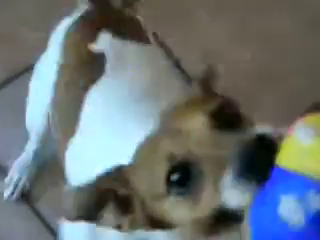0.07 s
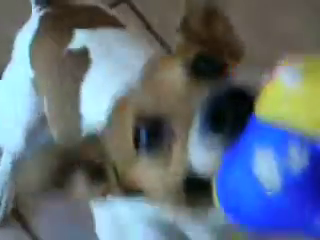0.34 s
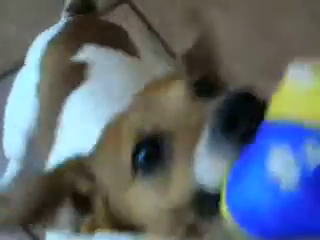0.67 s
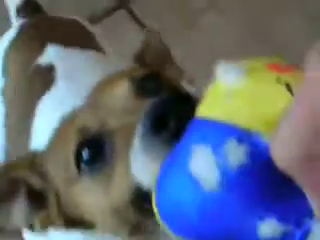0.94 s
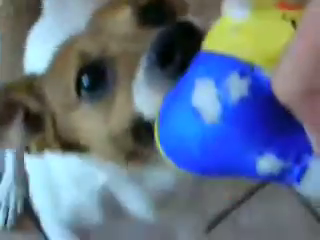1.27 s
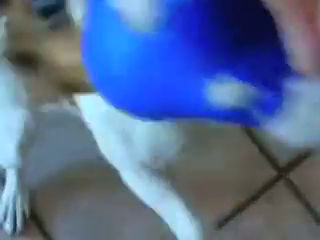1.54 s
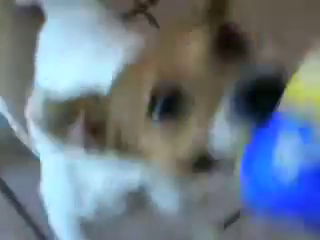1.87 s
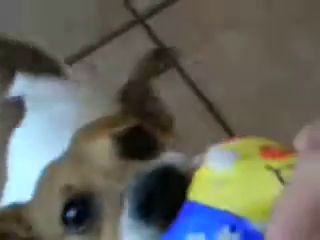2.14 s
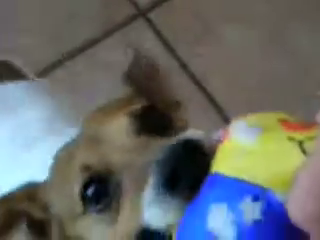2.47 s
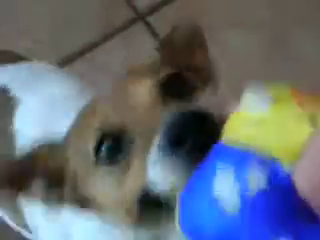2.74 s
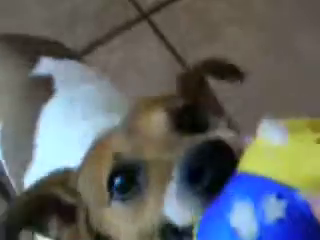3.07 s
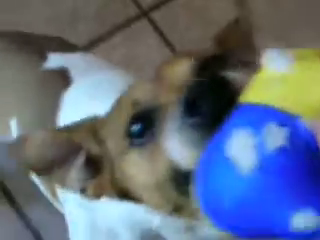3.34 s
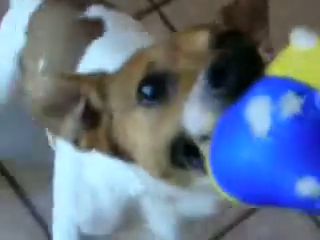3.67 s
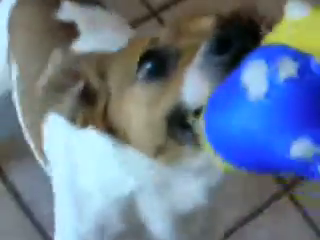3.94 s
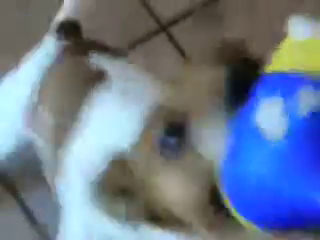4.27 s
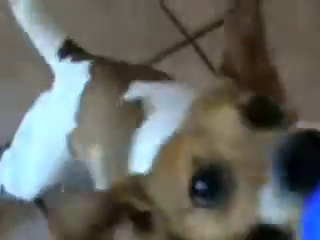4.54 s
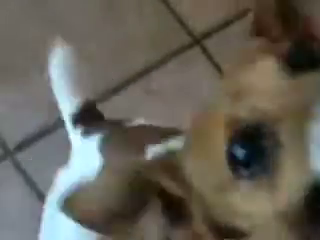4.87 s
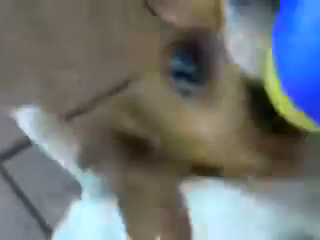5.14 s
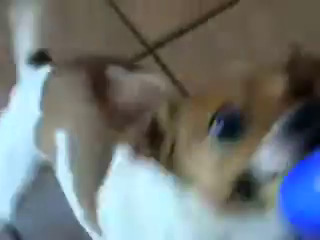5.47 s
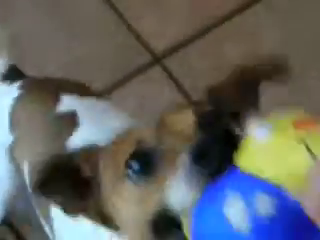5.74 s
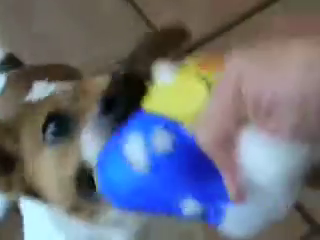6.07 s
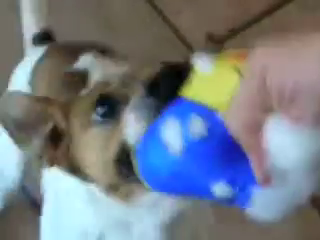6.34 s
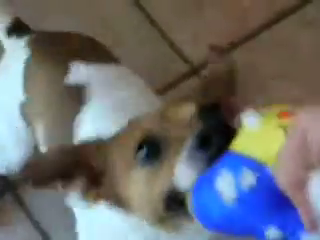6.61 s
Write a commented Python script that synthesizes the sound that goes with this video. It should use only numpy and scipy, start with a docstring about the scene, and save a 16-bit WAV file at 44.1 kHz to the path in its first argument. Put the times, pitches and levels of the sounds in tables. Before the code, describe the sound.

Close, fluttering growls from a small dog playing tug, each starting with a bark-like snap, in a ringing tiled room.

```python
"""First comes a short, clean whine: a small dog is tugging at a toy on a tiled floor, close by.
It yelps, then growls in six bouts, each opening with a bark-like snap and running on as a fluttering
rattle; once more the voice flips into a whine. Its vocal folds make the pitch; chest, throat and mouth
shape the barks and growls. Paws and toy knock and squeak, the hard room rings over a steady hiss,
and a narrow-band recorder limits and clips the peaks."""
import sys
import numpy as np
from scipy import signal
from scipy.fft import rfft, irfft, next_fast_len
from scipy.io import wavfile
from scipy.ndimage import uniform_filter1d, minimum_filter1d, map_coordinates

SR = 44100
rng = np.random.default_rng(int(sys.argv[2]) if len(sys.argv) > 2 else 0)


def pcm_store(signal):
    """Save signal as 16-bit PCM."""
    levels = np.round(np.clip(np.atleast_2d(signal), -1, 1) * 32767)
    wavfile.write(sys.argv[1], SR, levels.astype(np.int16).T)


N = 303849


def amp(db):
    """Turn decibels into a gain."""
    return 10 ** (np.asarray(db) / 20)


def unit(x):
    """Scale each row to an average (rms) level of 1."""
    return x / np.sqrt(np.mean(x ** 2, axis=-1, keepdims=True) + 1e-20)


def along(points, hz):
    """Read between (Hz, value) points on a log frequency axis."""
    freqs, values = np.transpose(points)
    return np.interp(np.log(hz + 1), np.log(freqs + 1), values)


def read(rows, t):
    """Read each column of a table at the times t."""
    times, *columns = np.transpose(rows)
    return [np.interp(t, times, column) for column in columns]


def wobble(rate, size):
    """A smooth curve through `rate` random points a second."""
    points = rng.standard_normal(int(N * rate / SR) + 4)
    return map_coordinates(points, [np.arange(size) * rate / SR])


def filtered(x, response):
    """Give each frequency of x its own gain."""
    size = next_fast_len(len(x) + 8192)
    return irfft(rfft(x, size) * response(np.fft.rfftfreq(size, 1 / SR)), size)[:len(x)]


def noise(spectrum, size):
    """Noise shaped by (Hz, dB) points, at an rms level of 1."""
    return unit(filtered(rng.standard_normal(size), lambda hz: amp(along(spectrum, hz))))


def causal(gain):
    """Turn each row of gains into a filter that rings only after it is struck."""
    cepstrum = irfft(np.log(gain + 1e-6))
    half = cepstrum.shape[-1] // 2
    cepstrum[:, 1:half] *= 2
    cepstrum[:, half + 1:] = 0
    return np.exp(rfft(cepstrum))


def add(track, start, sound):
    """Mix a sound into the track, `start` seconds in."""
    part = track[max(round(start * SR), 0):][:len(sound)]
    part += sound[:len(part)]


# One list per whine. Each row: time in seconds, pitch in Hz, level in dB,
# upper overtones in dB relative to that level.
WHINE_NOTES = [
    [(0, 411.7, -12, -13.5), (.06, 398, -12.5, -13), (.145, 392, -12, -12), (.167, 365.6, -9, -13.5)],
    [(4.36, 408.7, -18.5, -20.5), (4.382, 445, -13.5, -9), (4.42, 432.3, -15, -3),
     (4.448, 428.6, -14.5, -15)],
]
# Each row: harmonic number, strength in dB within its group (the lowest three, or the rest).
WHINE_HARMONICS = [(1, -8), (2, -0.5), (3, -4), (4, -24), (5, -22.5), (6, -24), (7, -27.5), (8, -30.5)]

def whines(waver=0.0099, fade_s=0.0025):
    """Tight vocal folds sing a clean high note whose upper overtones open with effort."""
    out, t = np.zeros(N), np.arange(N) / SR
    for note in WHINE_NOTES:
        start, end = note[0][0], note[-1][0]
        pitch, level_db, bright_db = read(note, t)
        phase = 2 * np.pi * np.cumsum(pitch * (1 + waver * wobble(90, N))) / SR
        on = (t >= start) & (t <= end)
        harmonics = np.array([amp(db) * np.cos(k * phase[on]) for k, db in WHINE_HARMONICS])
        low, high = unit(harmonics[:3].sum(0)), unit(harmonics[3:].sum(0))
        fade = np.clip(np.minimum(t[on] - start, end - t[on]) / fade_s, 0, 1)
        out[on] += fade * amp(level_db[on]) * (low + amp(bright_db[on]) * high)
    return out


# The tone of the hiss. Each row: frequency in Hz, relative level in dB.
HISS_SPECTRUM = [(50, -29.5), (130, -24.5), (200, -13), (1100, -17.5), (3500, -18), (4200, -28.5)]

def steady_hiss(level_db=-41.5):
    """A faint, steady hiss lies behind everything."""
    return amp(level_db) * noise(HISS_SPECTRUM, N)


# The parts of the airway that keep their shape. Each row: frequency in Hz, relative gain in dB.
CHEST_SHAPE = [(85, -40), (135, -13), (175, -4), (310, 2), (450, -1), (1000, -40)]
THROAT_SHAPE = [(300, -45), (480, -1.5), (640, 6.5), (1120, 6), (1300, -14), (2400, -28.5)]
MOUTH_SHAPE = [(500, -54), (1000, 5.5), (1600, -1), (2080, 4.5), (2500, -3.5), (3500, -3), (6000, -21)]
REST_PITCH_HZ, REST_LIP_HZ = 170, 3200

def airway(hz, jaw_hz, lip_hz, snarl_db, pitch_hz):
    """The airway's gain for each pulse: jaw and lips slide two resonances; snarl is the mouth's share."""
    def peak(centre, width_hz):
        return 1 / (1 + ((hz - centre[:, None]) / (width_hz / 2)) ** 2)

    throat = unit(amp(along(THROAT_SHAPE, hz)) * np.sqrt(peak(jaw_hz, width_hz=450)))
    # The lips ring just below the "lip edge", a frequency above which only a little leaks out.
    lip_ring = 1 + 1.64 * peak(0.828 * lip_hz, width_hz=300)
    below_edge = 1 / (1 + (hz / lip_hz[:, None]) ** 30)
    mouth = unit(amp(along(MOUTH_SHAPE, hz)) * np.sqrt(lip_ring * below_edge + 0.023))
    # The lower the voice, the more the chest sounds.
    chest_db = -14 - 7 * np.log2(pitch_hz / REST_PITCH_HZ)
    chest = amp(chest_db)[:, None] * unit(amp(along(CHEST_SHAPE, hz)))
    return unit(np.sqrt(throat ** 2 + (amp(snarl_db)[:, None] * mouth) ** 2 + chest ** 2))


def vocal_folds(pitch, rough, level_db, jaw_hz, lip_hz, rest_snarl_db,
                flutter_hz=24.54, flutter_depth=.085, jitter=.011, scatter_db=2.0, rasp=0.35, size=2048):
    """The folds slap shut once a cycle and ring the airway; loose tissue makes their rate flutter."""
    t = np.arange(len(pitch)) / SR
    hz, age = np.fft.rfftfreq(size, 1 / SR), np.arange(size) / SR
    flutter_rate = flutter_hz * (1 + .1 * wobble(6.6, len(t)))
    flutter = rough * np.sin(2 * np.pi * np.cumsum(flutter_rate) / SR)
    cycles = np.cumsum(pitch * (1 + flutter_depth * flutter)) / SR
    slap_times = np.interp(np.arange(cycles[-1]), cycles, t)
    # From here on, each control holds one value per slap.
    pitch, rough, level_db, jaw_hz, lip_hz = (
        np.interp(slap_times, t, control + 0 * t) for control in (pitch, rough, level_db, jaw_hz, lip_hz))
    late, strong = rng.standard_normal((len(slap_times), 2)).T
    slap_times += jitter * rough * late / pitch
    between_samples = slap_times - np.round(slap_times * SR) / SR
    slap = np.exp(-2j * np.pi * hz * between_samples[:, None])
    # In a rough voice a spurt of swirling air follows each slap.
    spurt = unit(rng.standard_normal((len(slap_times), size)) * np.exp(-age / 0.003)) / np.sqrt(size)
    air_gain = rasp * rough[:, None] * along([(300, 0.33), (3000, 1.99)], hz)
    snarl_db = rest_snarl_db - 6 * np.log2(lip_hz / REST_LIP_HZ)
    rings = irfft((slap + air_gain * rfft(spurt)) * causal(airway(hz, jaw_hz, lip_hz, snarl_db, pitch)))
    gains = amp(level_db + scatter_db * rough * strong) * np.sqrt(SR / pitch)
    out = np.zeros(len(t) + size)
    for start, gain, ring in zip(slap_times, gains, rings):
        add(out, start, gain * ring)
    return out


# Barks, yelps and the cracks that end a whine. Each row: start in seconds, length in seconds,
# top pitch in Hz, level in dB, opening snap in dB added to it, roughness from 0 to 1,
# jaw resonance at the top pitch in Hz, lip edge in Hz.
YELP_CALLS = [(.158, 0.018, 367.6, -14.5, -3, 0.5, 672, 3230),
              (.42, .155, 206.8, -16.5, 6.5, .75, 1140, 3015), (.585, .215, 250, -14.5, -1.5, 0, 874, 2240),
              (1.752, .115, 187.5, -16, 5, .65, 933, 4100), (2.818, .115, 237.9, -15, 9.5, 0.4, 1180, 3090),
              (3.564, .035, 181.6, -20.5, 2, 0.9, 806, 3770),
              (3.915, 0.1, 265.3, -13.5, 6, 0.5, 1160, 3080),
              (4.447, .045, 170.5, -18.5, 3.5, 1, 673, 3910),
              (5.012, .055, 146.3, -16, 7.5, 0.2, 1154, 3220),
              (5.071, .065, 158.6, -16.5, 5.5, 0.6, 940, 3230),
              (5.133, 0.11, 263.4, -12, -5.5, .12, 1154, 2440),
              (5.925, .1, 218.7, -16, 13, 0.9, 1150, 3510)]

def yelps(rise_oct=.3, sag_oct=.5, swell_db=0.5, droop_db=12.5, snap_s=0.016):
    """Short calls: pitch and level rise to the middle, then sag; a bark opens with a hard snap."""
    out = np.zeros(N)
    for start, length, top_hz, db, snap_db, rough, top_jaw_hz, lip_hz in YELP_CALLS:
        age = np.arange(int(length * SR)) / SR
        before = np.maximum(1 - 2 * age / length, 0) ** 2
        after = np.maximum(2 * age / length - 1, 0) ** 2
        snap = np.exp(-age / snap_s)
        pitch = top_hz * 2 ** (-rise_oct * before - sag_oct * after)
        level_db = db + snap_db * snap - swell_db * before - droop_db * after
        harsh = rough + (1 - rough) * np.maximum(snap, after) / 2
        jaw_hz = top_jaw_hz * pitch / top_hz
        add(out, start, vocal_folds(pitch, harsh, level_db, jaw_hz, lip_hz, rest_snarl_db=-3))
    return out


# Each row: start in seconds, rough peak level of the tick in dB, thud in dB relative to the tick.
FLOOR_KNOCKS = [(0.387, -13, -3.5), (4.759, -18, -2), (4.775, -27.5, 6.5), (4.963, -28, -1),
                (5.714, -20, -14), (5.882, -27.5, -13.5)]
# The tone of a thud. Each row: frequency in Hz, relative level in dB.
THUD_SPECTRUM = [(80, -22.5), (200, -0.5), (700, -8), (3000, -26)]

def knocks(tick_fade_s=0.1, thud_fade_s=0.089, peak_over_average_db=7):
    """Paws and toy hit the floor: a claw tick over a soft thud."""
    out, t = np.zeros(N), np.arange(SR // 4) / SR
    for start, db, thud_db in FLOOR_KNOCKS:
        tick = noise([(300, -28.0), (1200, 5.5), (3500, -4.5)], len(t)) * amp(-60 * t / tick_fade_s)
        thud = noise(THUD_SPECTRUM, len(t)) * amp(thud_db - 60 * t / thud_fade_s)
        add(out, start, amp(db - peak_over_average_db) * (tick + thud))
    return out


# Each entry: the start of a bout of growling in seconds.
BOUT_STARTS = [0.418, 1.75, 2.815, 3.915, 5.01, 5.926]

def onset_hisses(lead_s=0.016, hiss_db=-30, thump_db=-41, thump_fade_s=0.3):
    """A brief hiss swells just before each bout, and a faint low thump comes with its first snap."""
    out, t = np.zeros(N), np.arange(SR // 4) / SR
    swell = np.where(t < lead_s, t / lead_s, 0)
    for start in BOUT_STARTS:
        hiss = noise([(300, -4), (2600, 2.5), (5000, -24)], len(t))
        thump = noise([(100, -7), (900, -58)], len(t))
        add(out, start - lead_s, amp(hiss_db) * swell * hiss)
        add(out, start, amp(thump_db - 60 * t / thump_fade_s) * thump)
    return out


# Each row: extra level in dB, roughness, time in seconds when the rattle is half cleared, resting snarl
# in dB, resting jaw resonance in Hz, its final drop in octaves, and a course.
# Each row of a course: time in seconds, pitch in Hz, lip edge in Hz.
GROWL_CALLS = [(0.97, 0.83, 1.36, -5, 1000, 0.09, [(.79, 199.9, 2530), (.87, 202.4, 3080),
               (.92, 171.5, 3170), (1.04, 174.4, 3140), (1.16, 172.6, 3500), (1.3, 203.5, 2720),
               (1.37, 190.6, 2698), (1.46, 220.8, 2890), (1.505, 211, 2675)]),
               (-0.27, 1.1, 2.14, -4.5, 1120, 0.53, [(1.865, 134, 3850), (1.96, 170.9, 3630),
               (2.12, 174.5, 3550), (2.21, 183.2, 3600), (2.27, 204, 3480), (2.32, 183.7, 3380),
               (2.43, 172.8, 3470), (2.56, 160.5, 3530)]),
               (-0.049, 0.63, 3.38, -2.5, 1060, 0.14, [(2.93, 145.6, 3000), (2.99, 163.3, 3320),
               (3.13, 162.8, 3070), (3.24, 194.2, 2540), (3.37, 206.8, 2660), (3.45, 231.2, 3146),
               (3.54, 208.2, 3310), (3.575, 199.7, 3630)]),
               (1.3, 1.1, 4.45, -2, 1300, 0.01, [(4.025, 112.5, 3100), (4.1, 127.7, 3160),
               (4.23, 181, 2830), (4.29, 152.8, 3070), (4.35, 184, 3070)]),
               (0.2, 0.21, 5.4, -6.5, 1010, 0, [(5.25, 139, 2980), (5.28, 118.1, 3470), (5.36, 128.8, 3750),
               (5.45, 164.1, 3730), (5.485, 199.6, 3700), (5.545, 166.2, 3700)]),
               (-0.84, .9, 6.47, -4.5, 1200, 0.18, [(6.02, 121.5, 3540), (6.1, 112.6, 3800),
               (6.19, 146, 3750), (6.32, 169.8, 3530), (6.41, 151.6, 3680), (6.49, 198.9, 3650),
               (6.59, 134.6, 3950), (6.7, 151.2, 3795), (6.79, 132.7, 3806)])]
# A harder push is higher and louder. Each row: pitch in Hz, base level in dB.
LEVEL_BY_PITCH = [(110, -33), (130, -22.5), (148, -17), (175, -14.5), (205, -14.5), (230, -13.5)]

def growls(clear_s=0.04, rattle_left=0.16, close_s=.17, release_s=0.039, release_db=15):
    """Long calls: level and jaw follow the pitch; the rattle clears, the jaw closes, the voice lets go."""
    out = np.zeros(N)
    for db, rough, clears_at, snarl_db, rest_jaw_hz, close_oct, course in GROWL_CALLS:
        start, end = course[0][0], course[-1][0]
        t = np.arange(start, end, 1 / SR)
        pitch, lip_hz = read(course, t)
        closing = np.maximum(1 - (end - t) / close_s, 0)
        release = np.maximum(1 - (end - t) / release_s, 0)
        rattle = rattle_left + (1 - rattle_left) * (1 - np.tanh((t - clears_at) / clear_s / 2)) / 2
        open_db = 5 * np.log2(lip_hz / REST_LIP_HZ)  # a wider mouth lets more out
        level_db = db + along(LEVEL_BY_PITCH, pitch) + open_db - release_db * release
        jaw_hz = rest_jaw_hz * (pitch / REST_PITCH_HZ) * (REST_LIP_HZ / lip_hz)
        jaw_hz *= 2 ** (-close_oct * closing)
        add(out, start, vocal_folds(pitch, rough * rattle, level_db, jaw_hz, lip_hz, snarl_db))
    return out


# Each row: start in seconds, pitch in Hz, level in dB before mixing, length in seconds.
TOY_SQUEAKS = [(1.567, 1780, -33.5, 0.036), (4.839, 3460, -16, 0.0072)]

def squeaks():
    """Teeth slip on the toy and make short rubbery squeaks."""
    out, t = np.zeros(N), np.arange(SR // 4) / SR
    for start, hz, db, length in TOY_SQUEAKS:
        swell = np.sin(np.pi * np.clip(t / length, 0, 1))
        add(out, start, amp(db) * swell * np.sin(2 * np.pi * hz * t))
    return out


# How long the room rings. Each row: frequency in Hz, seconds to fade by 60 dB.
ROOM_RING_TIMES = [(150, 1), (1100, 0.65), (2500, 0.71), (4000, 0.68)]

def room(x, wall_db=-7.5, tail_db=-6.5, echo_count=10, step_s=.25):
    """Tiles and walls add a few early echoes and a ringing tail, both new for each stretch of sound."""
    out, t = x.copy(), np.arange(N) / SR
    for centre in np.arange(0, N / SR + step_s, step_s):
        hz, age, bands = signal.stft(rng.standard_normal(SR * 3 // 4), SR, nperseg=256)
        decay = amp(-60 * age / along(ROOM_RING_TIMES, hz)[:, None])
        tail = signal.istft(bands * decay, SR, nperseg=256)[1]
        tail *= np.clip(np.arange(len(tail)) / SR / 0.014, 0, 1)  # the tail fades in
        response = amp(tail_db) * tail / np.linalg.norm(tail)
        delays = (rng.uniform(0.00204, .025, echo_count) * SR).astype(int)
        response[delays] += amp(wall_db) * rng.standard_normal(echo_count) / np.sqrt(echo_count)
        near = np.flatnonzero(abs(t - centre) < step_s)
        if len(near):
            stretch = x[near] * np.cos(np.pi / 2 * (t[near] - centre) / step_s)
            add(out, t[near[0]], signal.fftconvolve(stretch, response))
    return out


def scene():
    """The dog and its toy in the room, over the hiss."""
    toy = squeaks()
    near = yelps() + growls() + whines() + knocks() + onset_hisses()
    # The toy is so close to the microphone that the room adds little to it.
    return (room(near + amp(-6.5) * toy) + toy + steady_hiss())[None]


def record(dry, band_hz=4050, top_hz=15900, ceiling=0.91, hold_s=0.0021,
           clip_level=0.78, hardness=22, offset=-0.027):
    """The recorder cuts the treble, turns peaks down fast, clips the rest and sits slightly off zero."""
    narrow = filtered(dry[0], lambda hz: 1 / np.sqrt(1 + (hz / band_hz) ** 40))
    width = int(hold_s * SR)
    gain = minimum_filter1d(np.minimum(1, ceiling / (abs(narrow) + 1e-9)), 2 * width)
    limited = narrow * uniform_filter1d(uniform_filter1d(gain, width), width)
    clipped = limited / (1 + abs(limited / clip_level) ** hardness) ** (1 / hardness)
    return filtered(clipped, lambda hz: hz < top_hz)[None] + offset


dry = scene()
out = record(dry)
pcm_store(out)
```